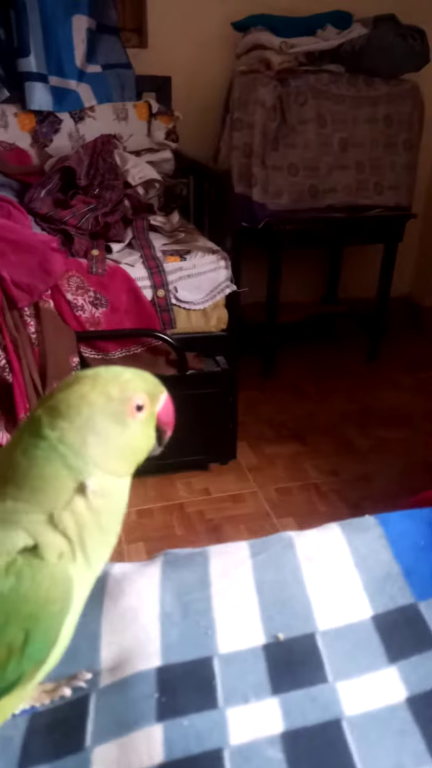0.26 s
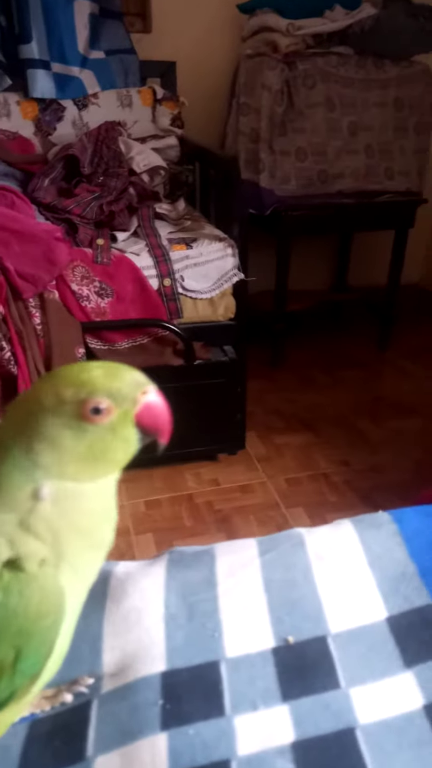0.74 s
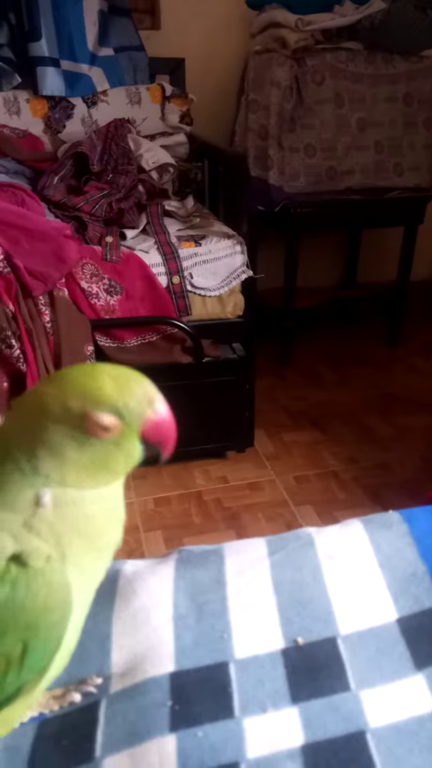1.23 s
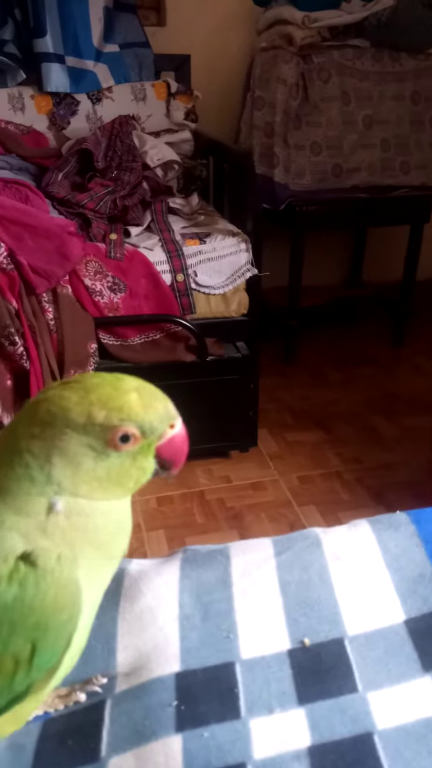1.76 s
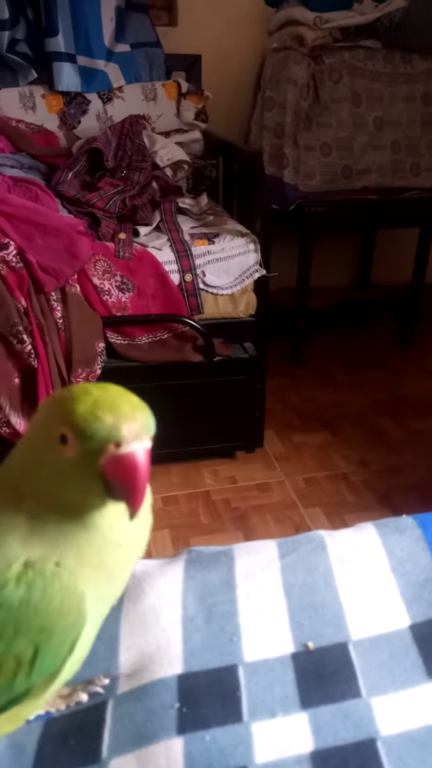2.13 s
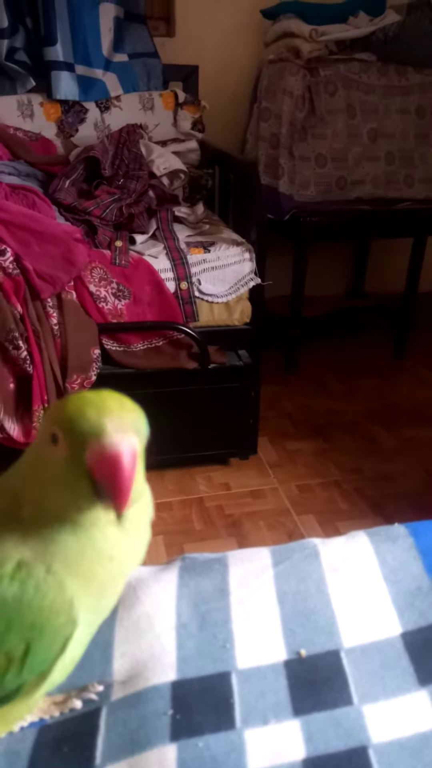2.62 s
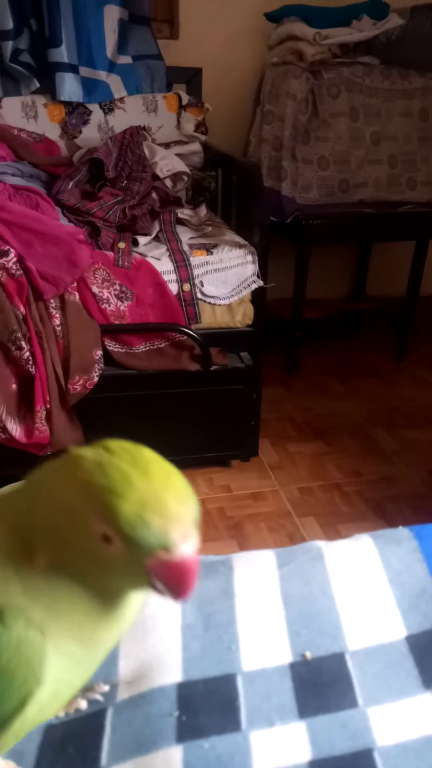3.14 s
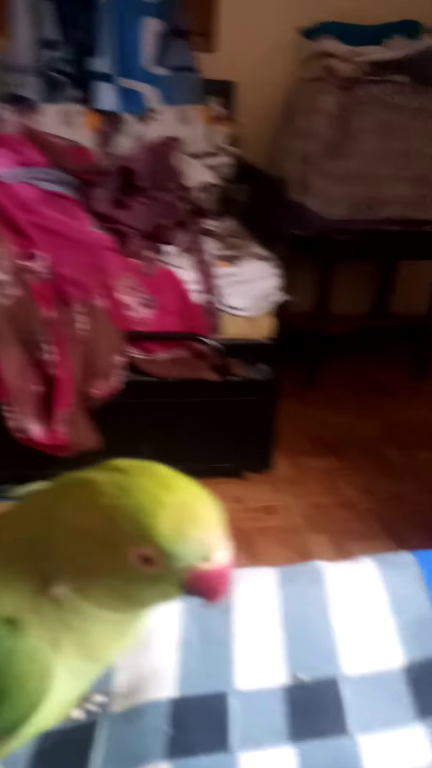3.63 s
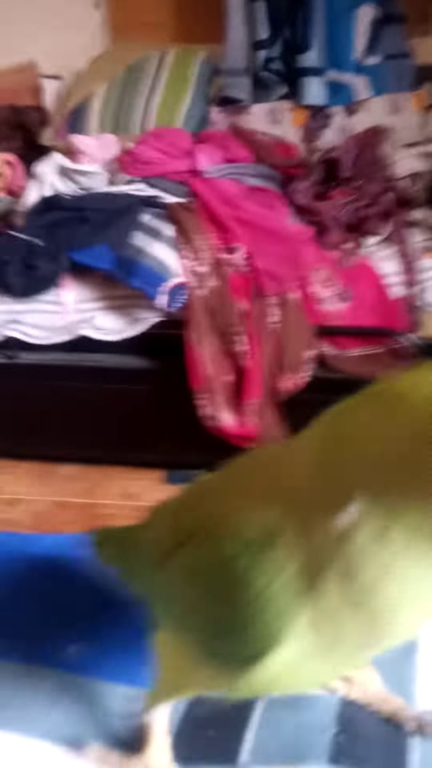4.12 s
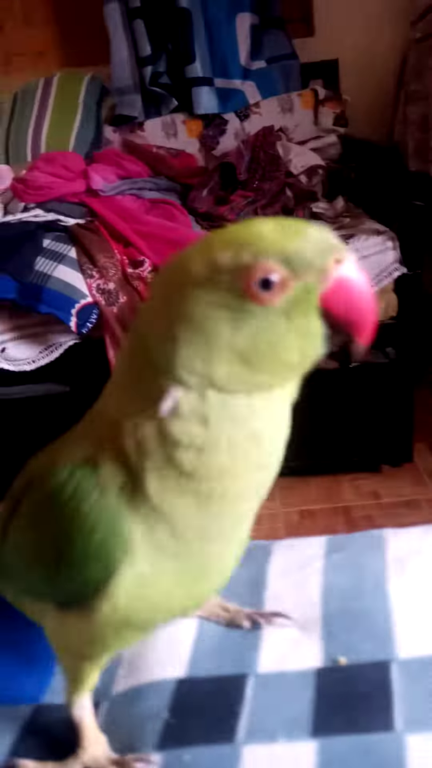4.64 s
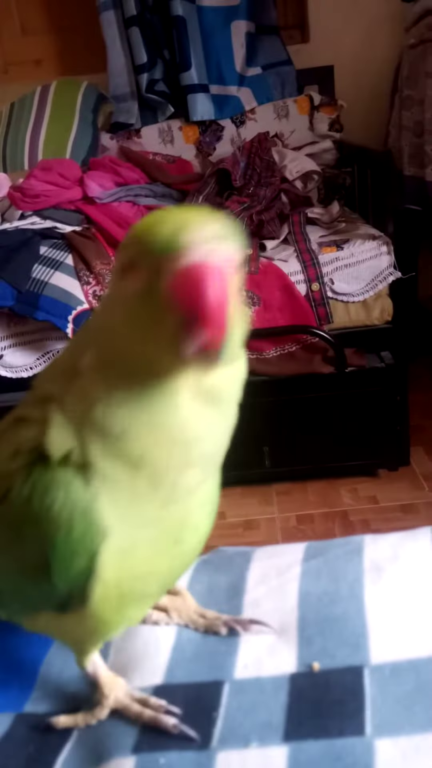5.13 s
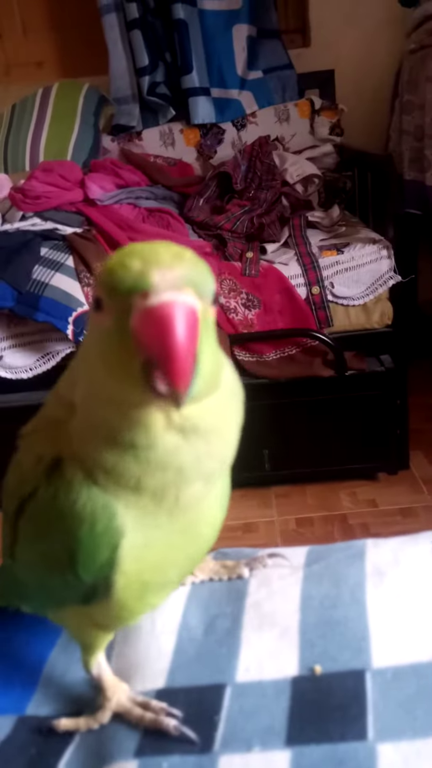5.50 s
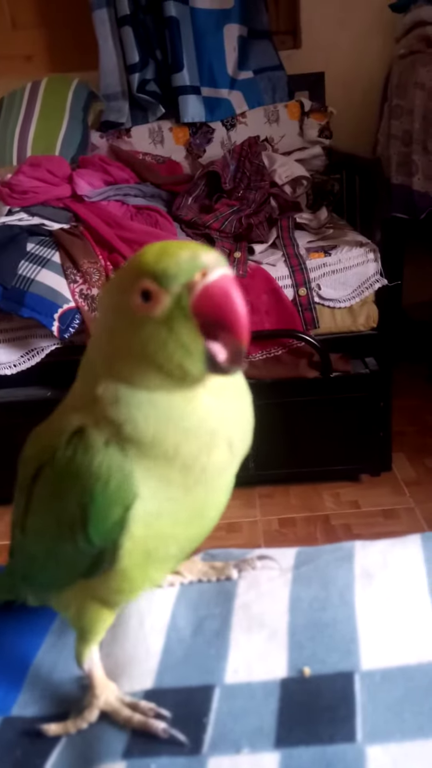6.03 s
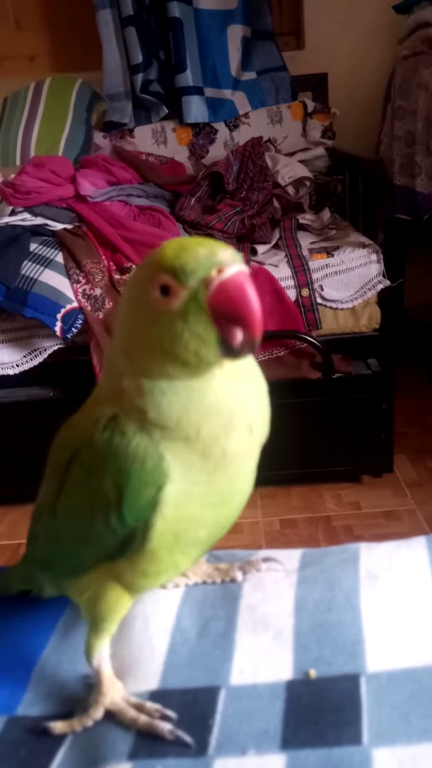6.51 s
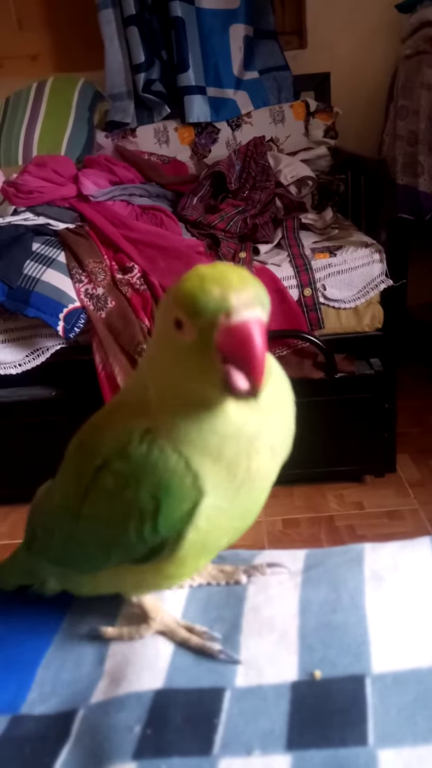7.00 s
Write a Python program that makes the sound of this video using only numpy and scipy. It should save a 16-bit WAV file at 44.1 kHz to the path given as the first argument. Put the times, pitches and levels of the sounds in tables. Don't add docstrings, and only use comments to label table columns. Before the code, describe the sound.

A small tiled bedroom with a faint, steady fan hum and airy rush, heard through a phone held near a parakeet. Low, soft rumbling puffs press on the microphone now and then, more often in the first three seconds. The bird screeches at about 0.2 s, lower and a little softer, then at 1.5 s and 3.2 s, with quiet gaps between. A quick, evenly spaced run of four brighter, harsher calls comes at 5.2, 5.55, 5.9 and 6.3 s, and a last, highest one with a longer whistle at 7.0 s. Each lasts under a fifth of a second: a gritty low buzz slides upward, jumps to a piercing whistle, breaks to a lower note and drops off. A short room ring follows each, and the fan and rumble duck under the calls.

```python
import sys
import numpy as np
from scipy import signal
from scipy.fft import rfft, irfft
from scipy.io import wavfile
from scipy.ndimage import uniform_filter1d

SR = 44100
rng = np.random.default_rng(int(sys.argv[2]) if len(sys.argv) > 2 else 0)


def invert_db(level):
    return 10 ** (np.asarray(level, dtype=float) / 20)


def int16_out(signal):
    q = np.round(np.clip(np.atleast_2d(signal).T, -1, 1) * 32767)
    wavfile.write(sys.argv[1], SR, q.astype(np.int16))


N = 320166


def on_log(table, hz):
    table_hz, values = np.transpose(table)
    return np.interp(np.log(np.maximum(hz, 1)), np.log(table_hz), values)


def unit(x):
    return x / np.sqrt(np.mean(x ** 2))


def colour(x, table):
    hz = np.fft.rfftfreq(len(x), 1 / SR)
    return irfft(rfft(x) * invert_db(on_log(table, hz)), len(x))


def walk(size, rate):
    k = max(int(SR / rate), 1)
    smooth = uniform_filter1d(rng.standard_normal(size), k)
    return unit(uniform_filter1d(smooth, k))


def fan():
    # frequency in Hz, level in dB per Hz.
    air_colour = [(65, -39), (110, -12), (206, -0.5), (376, -9.5), (409, -15), (473, -8), (503, -7.5),
                  (703, -16.5), (921, -17.5), (1130, -17.5), (3500, -21), (6670, -34), (9700, -53.5),
                  (16000, -56.5)]
    # frequency in Hz, level in dB, wander in Hz.
    motor_lines = [(204, -63, 7.5), (238, -63.5, 9), (409, -62, 5), (508, -59, 3.06), (609, -73, 5.4),
                   (907, -73, 8)]
    rush_db = -51.66 + 0.33 * walk(N, 6.8)
    rush = unit(colour(rng.standard_normal(N), air_colour)) * invert_db(rush_db)
    hum = np.zeros(N)
    for hz, db, wander_hz in motor_lines:
        level = np.sqrt(2) * invert_db(db + 0.67 * walk(N, 7.1))
        phase = 2 * np.pi * np.cumsum(hz + wander_hz * walk(N, 16.12)) / SR
        hum += level * np.sin(phase)
    return rush + hum


def puffs():
    # moment of the peak in seconds, peak level in dB.
    puff_times = [(.34, -58), (.62, -62), (.89, -57), (1.45, -66), (1.99, -60), (2.38, -57), (2.53, -59),
                  (2.77, -64), (3.56, -65), (3.8, -61.5), (4.27, -71), (4.6, -73), (4.99, -60.5),
                  (5.88, -60.5), (7.04, -64.5)]
    still_db, puff_s = -76, 0.044
    rumble_colour = [(15, -23), (30, -20.0), (70, 7.0), (110, 2.5), (200, -34), (400, -68.5)]  # (Hz, dB)
    rumble = unit(colour(rng.standard_normal(N), rumble_colour))
    t = np.arange(N) / SR
    swell = invert_db(still_db)
    for peak_s, db in puff_times:
        swell = swell + invert_db(db) * np.exp(-np.abs(t - peak_s) / puff_s)
    return rumble * swell


def phrase(buzz, whistle, note, buzz_db, whistle_db, note_db):
    # moment in seconds, share of the pitch lost.
    dips = [
        (1.613, .1),
        (1.638, .08),
        (3.275, .08),
        (5.299, .05),
        (5.656, .06),
    ]
    start_hz, swell_s, swell_share = 520, .012, .47
    scoop_hz_per_s, drift_hz_per_s = 105000, 2500
    flip_s = .003
    whistle_swell_db, whistle_swell_s = -7, .005
    whistle_flat, whistle_droop = .03, .015
    note_swell_db, note_swell_s = 3.5, 0.002
    fall_curve, dip_s = 1.9, .006
    buzz_start_db, slide_end_db, scoop_end_db = (-3, -8.5, -7), (1.5, 5.5, -1.5), (3, 2.5, -11)
    sag_end_db, mid_fall_db, fall_end_db = (-1.5, -6.5, 0.5), (3, 1, 7), (-12.5, -4.5, 2.5)
    pause_db_per_s = np.array([-1200, -500, -800])

    start, slid, slid_hz, scoop_hz = buzz
    high, high_hz, sag, sag_hz, sag_s = whistle
    low, low_hz, fall, end, end_hz = note
    buzz_end, whistle_end = high - flip_s, low - flip_s
    scooped = min(slid + (scoop_hz - slid_hz) / scoop_hz_per_s, buzz_end - 1e-4)
    sagged = min(sag + sag_s, whistle_end - 1e-4)

    b, w = np.array(buzz_db), np.array(whistle_db)
    scooped_db, sagged_db = b + scoop_end_db, w + sag_end_db
    paused_db = scooped_db + pause_db_per_s * (buzz_end - scooped)
    drifted_hz = sag_hz - drift_hz_per_s * (whistle_end - sagged)
    rows = [(start, start_hz, *(b + buzz_start_db)),
            (start + swell_s, start_hz + swell_share * (slid_hz - start_hz), *b),
            (slid, slid_hz, *(b + slide_end_db)),
            (scooped, scoop_hz, *scooped_db),
            (buzz_end, scoop_hz, *paused_db),
            (high, high_hz * (1 - whistle_flat), *(w + whistle_swell_db)),
            (high + whistle_swell_s, high_hz, *w),
            (sag, high_hz * (1 - whistle_droop), *w),
            (sagged, sag_hz, *sagged_db),
            (whistle_end, drifted_hz, *sagged_db)]

    t = np.arange(low, end, .002)
    fallen = np.clip((t - fall) / (end - fall), 0, 1)
    hz = low_hz - (low_hz - end_hz) * fallen ** fall_curve
    hz = hz * (1 - sum(share * np.exp(-((t - s) / dip_s) ** 2) for s, share in dips))
    swell_db = note_swell_db * np.clip(1 - (t - low) / note_swell_s, 0, 1)
    gains = (0, note_db[3], 0)
    levels = []
    for db, mid, last, gain in zip(note_db, mid_fall_db, fall_end_db, gains):
        fall_db = np.interp(fallen, [0, .4, 1], [0, mid + gain, last + gain])
        levels.append(db + swell_db + fall_db)
    return rows + list(zip(t, hz, *levels))


def beak_of(shift, throat_db, nasal_db, treble_db, top_db):
    # frequency in Hz, level in dB.
    beak_colour = [(500, -58), (1100, -15), (2600, 6.5), (4200, -1), (5300, -8), (6500, -6.5), (9000, -22),
                   (12500, -31.5)]
    throat_hz, nasal_hz, treble_hz = 2600, 6500, 8000

    def near(hz, centre):
        return np.exp(-(np.log(hz / centre) / 0.13) ** 2)

    table = [(290, -46)]
    for hz, db in beak_colour:
        peaks_db = throat_db * near(hz, throat_hz) + nasal_db * near(hz, nasal_hz)
        table.append((hz * shift, db + peaks_db + treble_db * (hz > treble_hz)))
    return table + [(16000, top_db)]


def screech(rows, beak, rasp_db, jitter_hz=22, buzz_jitter_hz=-4, shimmer_db=2.1, edge_s=0.0039):
    blur_hz, blur_rate_hz, blur_rad = 8000, 1200, 1.2
    buzz_rasp_db = -6
    s, *columns = np.transpose(rows)
    t = np.arange(s[0], s[-1], 1 / SR)
    hz, first_db, second_db, upper_db = (np.interp(t, s, c) for c in columns)
    flips = uniform_filter1d(1. * (np.abs(np.gradient(hz)) * SR > 130000), 60)
    slack = np.clip(2 - hz / 1200, 0, 1)
    hz = hz + (jitter_hz + buzz_jitter_hz * slack) * walk(len(t), 900)
    phase = 2 * np.pi * np.cumsum(hz) / SR

    k = np.arange(3, 37)[:, None]
    size = invert_db(on_log(beak, k * hz)) * (k * hz < .4 * SR)
    tearing = np.clip(np.minimum(k * hz / blur_hz - .5, k / 6), 0, 1) ** 2
    torn = tearing * blur_rad * walk(len(t), blur_rate_hz)
    upper = np.sum(size * np.sin(k * phase + 0.303 * k ** 2 + torn), axis=0)
    upper = upper / np.sqrt(np.sum(size ** 2, axis=0))
    tone = invert_db(first_db) * np.sin(phase) + invert_db(second_db) * np.sin(2 * phase) + invert_db(upper_db) * upper
    tone = np.sqrt(2) * tone * (1 - flips) ** 2 * invert_db(shimmer_db * walk(len(t), 270))

    effort = np.sqrt(invert_db(2 * first_db) + invert_db(2 * second_db) + invert_db(2 * upper_db))
    rasp = unit(colour(rng.standard_normal(len(t)) * (1 + np.cos(phase)), beak))
    rasp = invert_db(rasp_db + buzz_rasp_db * (hz < 1500)) * effort * rasp
    edges = np.clip(np.minimum(t - s[0], s[-1] - t) / edge_s, 0, 1)
    return (tone + rasp) * edges


def bedroom(t60_s, gap_s=0.0019, build_s=0.0015):
    # frequency in Hz, share of the ring time.
    ring_share = [(500, 0.92), (2500, 0.92), (7000, 0.78), (15000, 0.55)]
    wall_s, wall_db = .014, -8
    t = np.arange(SR // 2) / SR
    hz = np.fft.rfftfreq(len(t), 1 / SR)
    spectrum = rfft(rng.standard_normal(len(t)))
    echoes = np.zeros(len(t))
    for centre in 500 * 2. ** np.arange(6):
        band = np.clip(1 - np.abs(np.log2(np.maximum(hz, 1) / centre)), 0, 1)
        decay = invert_db(-60 * t / (t60_s * on_log(ring_share, centre)))
        echoes += irfft(spectrum * band, len(t)) * decay
    echoes = echoes * np.clip((t - gap_s) / build_s, 0, 1)
    echoes = echoes / np.sqrt(np.sum(echoes ** 2))
    echoes[int(wall_s * SR)] += invert_db(wall_db)
    return echoes


def parakeet():
    # start in seconds, end of the slide in seconds, pitch reached in Hz,
    # pitch after the upward scoop in Hz.
    buzzes = [
        (.169, .191, 730, 1270),
        (1.537, 1.564, 880, 2670),
        (3.171, 3.203, 880, 2100),
        (5.193, 5.219, 1080, 2100),
        (5.557, 5.586, 1230, 2420),
        (5.922, 5.96, 1290, 2500),
        (6.322, 6.351, 1160, 2560),
        (7.01, 7.053, 1150, 2520),
    ]
    # start in seconds, pitch in Hz, start of the sag in seconds,
    # pitch it sags to in Hz, length of the sag in seconds.
    whistles = [
        (.243, 3090, .251, 2900, .017),
        (1.581, 3400, 1.598, 2990, .014),
        (3.219, 3580, 3.236, 3140, .015),
        (5.23, 3360, 5.25, 2990, .013),
        (5.599, 3420, 5.62, 2990, .014),
        (5.976, 3620, 5.992, 3300, .012),
        (6.371, 3710, 6.39, 3400, .011),
        (7.068, 3860, 7.108, 3330, .025),
    ]
    # start in seconds, pitch in Hz, start of the fall in seconds,
    # end in seconds, last pitch in Hz.
    notes_low = [
        (.287, 2050, .285, .354, 1460),
        (1.614, 2400, 1.648, 1.688, 1480),
        (3.269, 2240, 3.292, 3.33, 1500),
        (5.289, 2350, 5.311, 5.348, 1320),
        (5.657, 2320, 5.682, 5.712, 1200),
        (6.006, 2450, 6.039, 6.078, 1520),
        (6.403, 2490, 6.434, 6.483, 1250),
        (7.136, 2560, 7.16, 7.195, 1240),
    ]
    # fundamental in dB, second partial in dB, higher partials in dB.
    buzz_levels = [(-38, -39, -26.5), (-35.5, -36.5, -24.5), (-35, -39, -20.5), (-32, -28.5, -20.5),
                   (-33, -30.5, -21.5), (-30, -32, -23), (-31, -28.5, -21.5), (-31.5, -31.5, -25)]
    # fundamental in dB, second partial in dB, higher partials in dB.
    whistle_levels = [(-22.5, -29.5, -45), (-21, -34.5, -59), (-18, -30.5, -58), (-15.5, -25, -48),
                      (-19, -24, -44.5), (-21.5, -29.5, -48), (-19.5, -34, -49), (-16, -32, -39.5)]
    # fundamental in dB, second partial in dB, higher partials in dB,
    # gain of the second partial in the fall in dB.
    note_levels = [(-28.5, -36, -38, 11), (-26.5, -27, -38.5, 2.5), (-30.5, -21, -38, 1),
                   (-22.5, -33, -31, 10.5), (-23, -31.5, -31, 8), (-28, -26, -33.5, 5),
                   (-30, -28, -33, 5.5), (-28.5, -29.5, -36, 2)]
    # factor that moves the resonances, throat peak in dB,
    # nasal peak in dB, treble in dB, top end in dB.
    heads = [(1.06, -13, -1, -6.5, -34), (1.124, -9, -8, -15.5, -50), (1.065, -23.5, -11, -16, -33.5),
             (0.98, 13, 11.5, 9, -35), (0.95, 14.5, 15, 12.5, -26), (0.93, 2, 6, 8.5, -26.5),
             (0.93, 5, 6.5, 9, -27), (0.94, -11.5, 4.5, 6.5, -18.5)]
    # room share in dB, rasp in dB, ring time in seconds.
    places = [(0, -15.5, 0.37), (-2, -15, 0.38), (-7, -19, 0.38), (-5.5, -21.5, 0.42), (-3.5, -19, 0.39),
              (-3.5, -23, 0.45), (-2.5, -33, 0.47), (-4.5, -41, 0.6)]
    # frequency in Hz, level in dB.
    wall_colour = [(500, -6), (1100, -23), (2200, -4.5), (3600, 3), (6500, -1), (10000, -1), (15000, -11)]
    out = np.zeros(N + SR)
    calls = zip(buzzes, whistles, notes_low, buzz_levels, whistle_levels, note_levels, heads, places)
    for *parts, head, (room_db, rasp_db, t60_s) in calls:
        rows = phrase(*parts)
        voice = screech(rows, beak_of(*head), rasp_db)
        wet = invert_db(room_db) * signal.fftconvolve(colour(voice, wall_colour), bedroom(t60_s))
        start = int(rows[0][0] * SR)
        out[start:start + len(voice)] += voice
        out[start:start + len(wet)] += wet
    return out[:N]


def scene(top_db=-30, squeeze=0.53, hold_s=0.01):
    limit_db, limit_s = -11, 0.012
    bird = parakeet()

    def power_db(window_s):
        return 10 * np.log10(uniform_filter1d(bird ** 2, int(window_s * SR)).clip(1e-12))

    held = bird * invert_db(-.7 * np.maximum(power_db(limit_s) - limit_db + 4, 0))
    duck = invert_db(-squeeze * np.maximum(power_db(hold_s) - top_db, 0))
    return (held + (puffs() + fan()) * duck)[None]


def band_limit(x):
    return signal.sosfilt(signal.butter(12, 17010, fs=SR, output="sos"), x)


def record(dry):
    # frequency in Hz, level in dB.
    port_colour = [(9000, 0.18), (12500, -9), (13600, -7.5), (14400, 5), (15200, 5.5), (15750, 4),
                   (16000, -46)]
    mix = colour(dry[0], port_colour)[None]
    return band_limit(mix)


dry = scene()
out = record(dry)
int16_out(out)
```